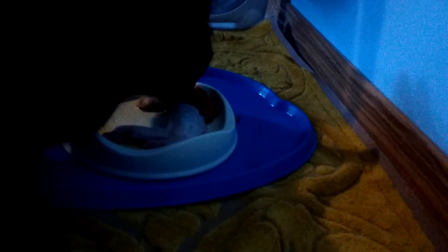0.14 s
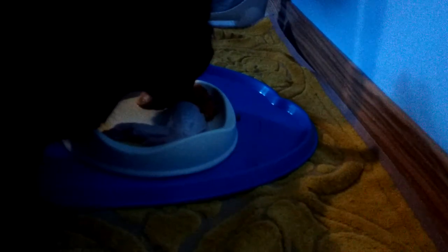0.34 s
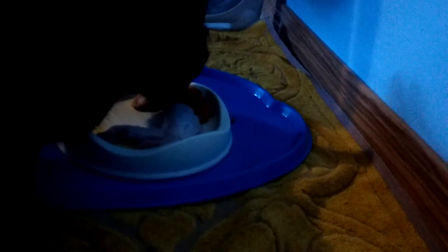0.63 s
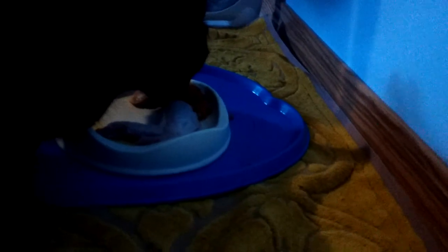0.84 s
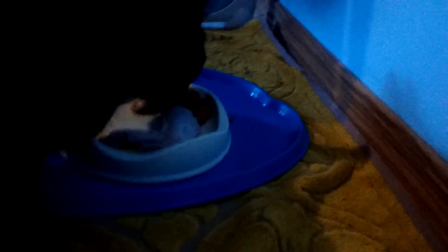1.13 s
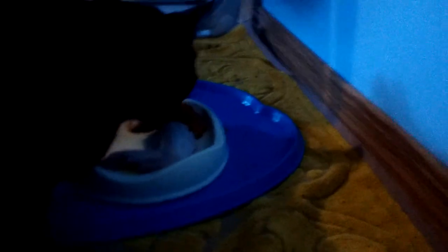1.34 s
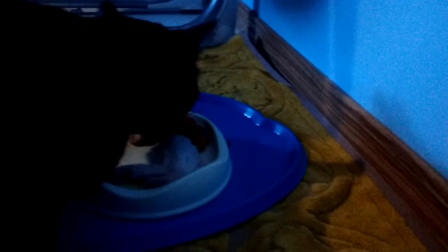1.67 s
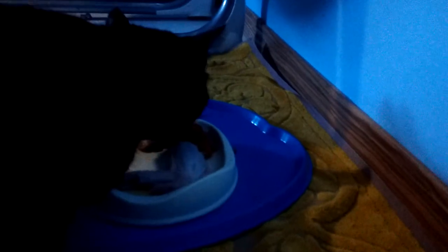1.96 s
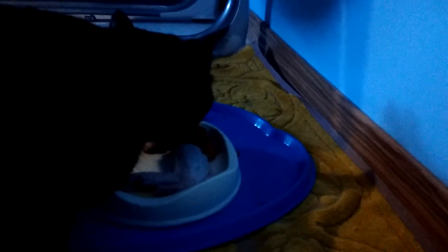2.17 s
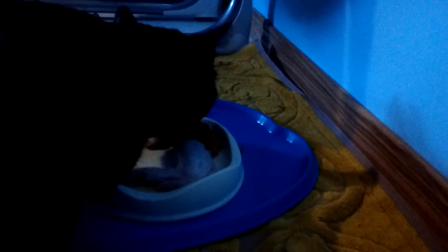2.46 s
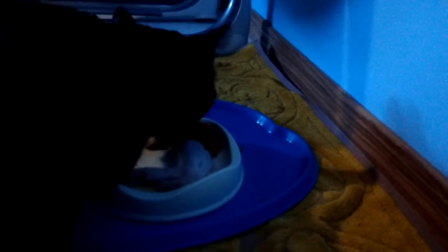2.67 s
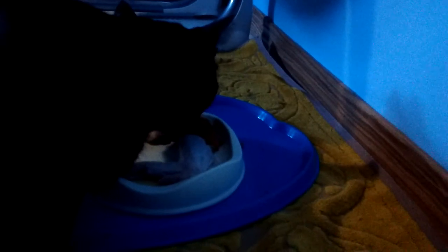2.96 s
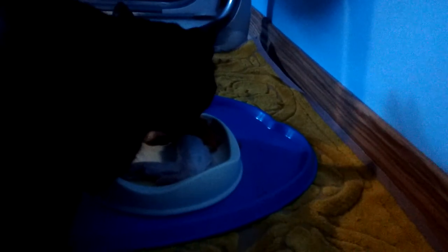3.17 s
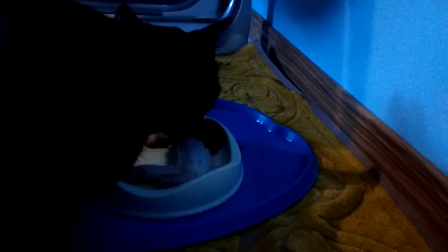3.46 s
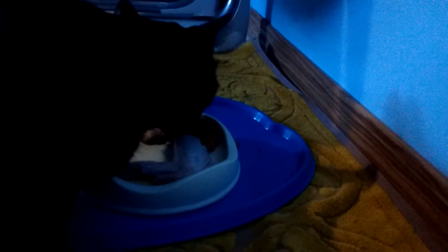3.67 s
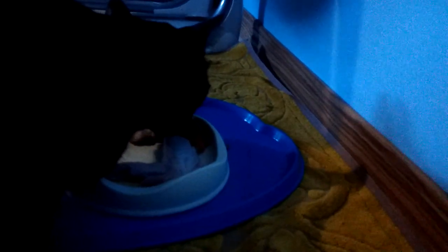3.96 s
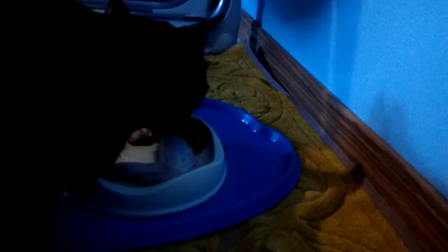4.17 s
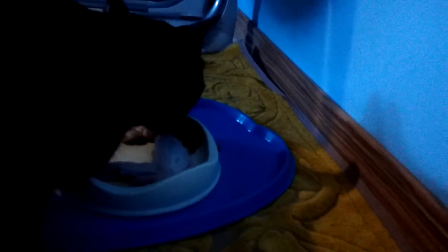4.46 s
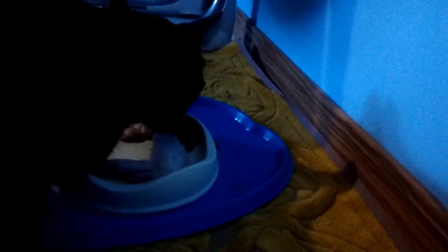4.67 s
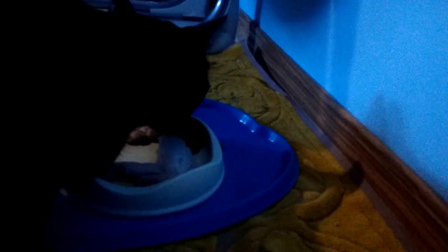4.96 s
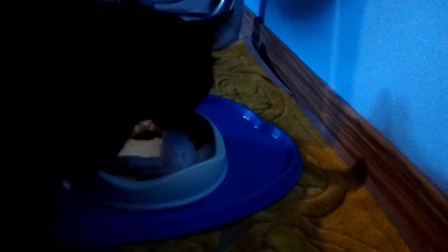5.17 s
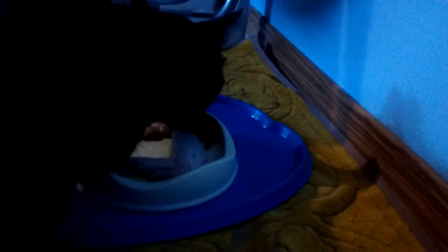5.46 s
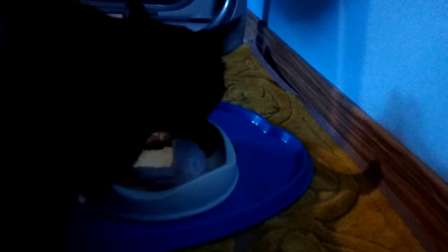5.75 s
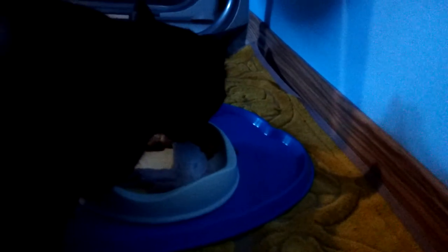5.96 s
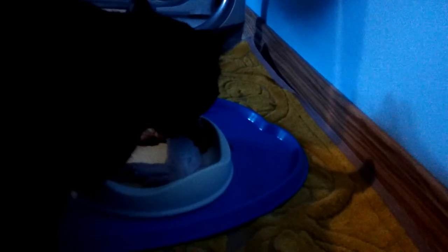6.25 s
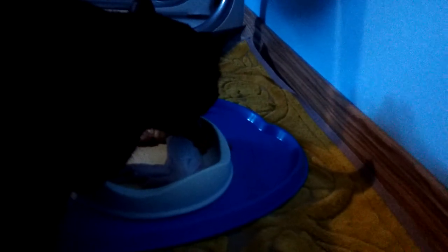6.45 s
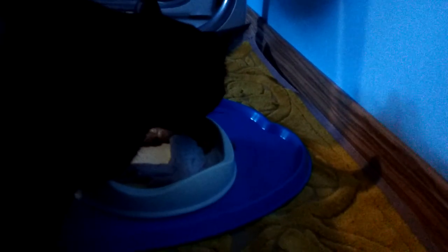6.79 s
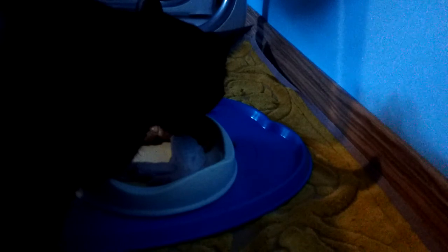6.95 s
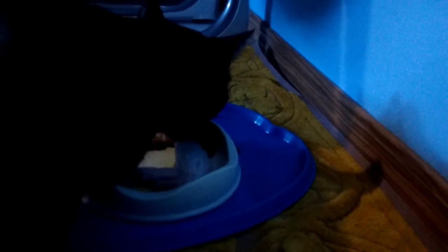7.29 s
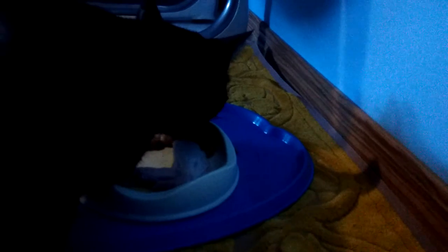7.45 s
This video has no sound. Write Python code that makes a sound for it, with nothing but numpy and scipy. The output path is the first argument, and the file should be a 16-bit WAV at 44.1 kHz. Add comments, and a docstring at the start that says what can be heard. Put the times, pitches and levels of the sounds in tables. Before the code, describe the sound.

Close, quiet wet chewing and licking by a cat, with small crackles, thin nasal breaths, an occasional bowl bump and clink over low room rumble.

```python
"""Cat eating wet food from a glazed bowl

Pops through mouth cavities make wet smacks, spit ticks and crackle; gliding tones and hissing breaths make the nose.
Metallic clinks, of teeth on the bowl and probably a collar tag, drive one set of ringing modes and a direct scrape.
The bowl bumps on its mat as decaying low sines. A quiet room adds an early copy, a short tail, rumble, hiss, hum
and whine. A pair of interleaved combs widens the stereo picture.
"""
import sys
import numpy as np
from scipy import signal
from scipy.fft import rfft, irfft, next_fast_len
from scipy.io import wavfile
from scipy.ndimage import map_coordinates

SR = 44100
rng = np.random.default_rng(int(sys.argv[2]) if len(sys.argv) > 2 else 0)


def unload_wav(signal):
    """Save mono or channel-first audio to the path in sys.argv[1] as 16-bit WAV at rate SR, clipped to [-1, 1]."""
    wavfile.write(
        sys.argv[1],
        SR,
        np.round(np.clip(np.atleast_2d(signal).T, -1, 1) * 32767).astype(np.int16),
    )


N = 336042


def amp(db):
    """Converts dB to amplitude."""
    return 10 ** (np.asarray(db) / 20)


def unit(x):
    """Scales each row to rms 1."""
    return x / np.sqrt(np.mean(x ** 2, axis=-1, keepdims=True) + 1e-20)


def along(points, hz):
    """Interpolates (Hz, value) points on a log frequency axis."""
    f, v = np.transpose(points)
    return np.interp(np.log(hz + 1), np.log(f + 1), v)


def wobble(knots_per_s):
    """Smooth random curve through normally distributed knots."""
    knots = rng.standard_normal(int(N * knots_per_s / SR) + 4)
    return map_coordinates(knots, [np.arange(N) * knots_per_s / SR])


def filtered(x, response):
    """Applies a complex frequency response to x."""
    m = next_fast_len(x.shape[-1] + SR // 2)
    return irfft(rfft(x, m) * response(np.fft.rfftfreq(m, 1 / SR)), m)[..., :x.shape[-1]]


def resonance(f, hz, width_hz):
    """Second-order bandpass response, gain 1 at its centre."""
    return 1j * f * width_hz / (hz * hz - f * f + 1j * f * width_hz)


def add(track, start_s, sound):
    """Mixes a sound into the track, cut at the track's end."""
    part = track[round(start_s * SR):][:len(sound)]
    part += sound[:len(part)]


def noise(response, correlation):
    """Shaped noise of rms 1 at two ports with the given correlation."""
    a, b = filtered(rng.standard_normal((2, N)), response)
    turn = np.arccos(np.clip(correlation, -1, 1)) / 2
    shared, opposed = np.cos(turn) * a, np.sin(turn) * b
    return unit(np.array([shared + opposed, shared - opposed]))


SNAP_SHARE = 0.13  # part of a pop that escapes its cavity, broad


def pops(start_s, level_db, hz, breadth, rustle_t60_s, rough):
    """Each pop is a snap with a dying rustle, coloured by one cavity resonance."""
    size = 4096
    t, f = np.arange(size) / SR, np.fft.rfftfreq(size, 1 / SR)
    push = rough * rng.standard_normal((len(start_s), size)) * amp(-60 * t / rustle_t60_s)
    push[:, 0] += rng.choice([-1, 1], len(start_s))  # the snap
    cavity = resonance(f, hz[:, None], 2.87 * (hz * breadth)[:, None]) ** 2
    escaped = SNAP_SHARE * resonance(f, hz[:, None], 2.1 * hz[:, None])
    sounds = irfft(rfft(push) * (cavity + escaped), size)[:, :size // 2]
    track = np.zeros(N)
    for start, level, sound in zip(start_s, level_db, sounds):
        add(track, start, amp(level) * sound / np.abs(sound).max())
    return track


# Wet smacks of lips and tongue. Each row: start in seconds, peak in dB before the lip filter, mouth pitch in Hz.
SMACKS = [(0.1937, -33, 2260), (.2504, -34.5, 2790), (0.537, -32, 2190), (0.6069, -31, 1000),
          (.6984, -19.5, 1480), (0.7408, -36, 1200), (.8461, -34.5, 790), (1.0086, -33, 1100),
          (1.1, -35, 2340), (1.217, -34.5, 2370), (1.3424, -39, 1200), (1.4163, -36, 2230),
          (1.632, -34, 1200), (1.706, -28, 2290), (2.0564, -34, 1160), (2.198, -38, 1000),
          (2.29, -34, 3000), (2.4786, -25.5, 1140), (2.917, -33, 2930), (3.056, -35, 2500),
          (3.15, -30.5, 875), (3.194, -31.5, 2720), (3.3438, -37, 2620), (3.4518, -43, 2500),
          (3.6459, -39, 990), (3.7368, -23, 1380), (3.755, -38, 1600), (3.768, -34, 1600),
          (3.7782, -35, 1500), (3.979, -19, 1350), (4.009, -39, 1500), (4.017, -30, 1640),
          (4.024, -39, 1600), (4.0482, -25, 3070), (4.052, -32, 1300), (4.06, -33, 2650),
          (4.2454, -32.5, 1300), (4.283, -26.5, 2550), (4.2867, -33, 2510), (4.29, -33, 2030),
          (4.6866, -37, 1130), (4.794, -35, 2610), (5.0378, -25.5, 2500), (5.2335, -27, 1040),
          (5.24, -32, 990), (5.3034, -36, 2300), (5.483, -17, 1480), (5.504, -38, 1000), (5.7806, -31, 830),
          (6.0706, -33, 1210), (6.3719, -32, 1510), (6.467, -35.5, 2400), (6.5815, -33.5, 2000),
          (6.797, -36, 940), (6.8175, -39, 1780), (6.9838, -38, 2290), (7.241, -34.5, 1090),
          (7.354, -32.5, 1110), (7.4348, -33, 2760), (7.4769, -37, 2260)]
SMACK_T60_S, SMACK_ROUGH = 0.017, 0.1
SMACK_BREADTH_AT_1KHZ, NARROWING = 0.74, 1.2  # a smaller mouth rings higher and narrower


def smacks():
    """Broad mouth pops echo off the bowl floor and its held air; soft lips dull them."""
    start_s, peak_db, hz = np.transpose(SMACKS)
    breadth = SMACK_BREADTH_AT_1KHZ * (hz / 1000) ** -NARROWING
    dry_smacks = pops(start_s, peak_db, hz, breadth, SMACK_T60_S, SMACK_ROUGH)

    def lips_and_bowl(f):
        held_air = 1 + 0.45 * resonance(f, 700, 380)
        floor_echo = 1 + 0.42 * np.exp(-2j * np.pi * f * 0.003287)
        return held_air * floor_echo / (1 + 1j * f / 4300) ** 3

    return filtered(dry_smacks, lips_and_bowl)


# Bursting spit films. Each row: start in seconds, peak in dB, pitch in Hz.
TICKS = [(.1926, -42, 7000), (0.2503, -37.5, 3780), (.506, -38, 6600), (.537, -34.5, 4320),
         (0.6028, -30, 4730), (0.607, -33, 4320), (0.607, -35, 7700), (.715, -35, 5000),
         (0.804, -31.5, 4500), (.831, -39, 4800), (.846, -39, 4800), (1.042, -45, 7300), (1.105, -41, 4200),
         (1.1271, -36, 7160), (1.138, -43, 7500), (1.1554, -42, 7400), (1.2163, -34, 10200),
         (1.342, -39, 4830), (1.397, -39, 4300), (1.4136, -37, 6200), (1.67, -42, 7900), (1.69, -43, 6800),
         (1.707, -33, 3800), (1.7323, -40, 8050), (2.056, -28, 5600), (2.23, -45, 7000),
         (2.2918, -40, 5100), (2.309, -41, 4000), (2.479, -46, 3900), (2.532, -40, 3900),
         (2.5922, -42, 8600), (2.603, -42, 10930), (2.917, -38.5, 8600), (2.9571, -41.5, 4670),
         (2.977, -42, 8200), (3.1959, -39, 9400), (3.4515, -36, 4750), (3.452, -30.5, 10100),
         (3.5456, -44, 7500), (3.6454, -41, 6400), (3.737, -49, 4640), (3.8112, -37, 11300),
         (3.866, -39, 10300), (3.9585, -45, 11700), (4.048, -37, 4000), (4.051, -32.5, 7840),
         (4.0605, -38, 7300), (4.1815, -41.5, 5000), (4.2451, -42, 4340), (4.2873, -37, 5460),
         (4.555, -44, 10060), (5.036, -40.5, 4100), (5.102, -42, 8650), (5.2167, -37.5, 5170),
         (5.3044, -35, 3800), (5.593, -44, 9900), (5.594, -45, 5000), (5.783, -36, 7500),
         (6.0704, -42, 5170), (6.37, -40, 3600), (6.5968, -42, 4040), (6.5762, -40, 10100),
         (6.6872, -43, 6600), (6.878, -37, 9100), (6.9804, -48, 8600), (7.0293, -48, 10400),
         (7.162, -33, 3380), (7.1716, -41, 5950), (7.2408, -33, 4500), (7.242, -40, 6900),
         (7.3395, -40.5, 6230), (7.4219, -39, 9100), (7.587, -38, 9200)]
TICK_T60_S, TICK_BREADTH = 0.0064, 0.18
CRACKLE_FLOOR_DB, CRACKLE_SPREAD_DB = -50, 1.5  # spread: mean rise above the floor


def spit():
    """Bursting films pop in narrow resonances, over a faint random crackle from 1.5 to 12 kHz."""
    start_s, peak_db, hz = np.transpose(TICKS)
    ticks = pops(start_s, peak_db, hz, TICK_BREADTH, TICK_T60_S, rough=0.58)
    when, size, pitch = rng.random(size=(350, 3)).T
    crackle_db = CRACKLE_FLOOR_DB - CRACKLE_SPREAD_DB * np.log(size)
    crackle = pops(when * N / SR, crackle_db, 1500 * 8 ** pitch, 0.28, TICK_T60_S, rough=0.88)
    return ticks + crackle


# Nose whistles, one list per curve. Each row: time in seconds, pitch in Hz, level in dB; pitch and level waver around it.
WHISTLES = [
    [(1.96, 5290, -60), (2.04, 5320, -53), (2.11, 5400, -51.5), (2.17, 5400, -60), (2.195, 5600, -55),
     (2.21, 5400, -57), (2.23, 6120, -50), (2.26, 5600, -61), (2.29, 5450, -55), (2.33, 5550, -56),
     (2.345, 5900, -61), (2.365, 5620, -64), (2.395, 5680, -60), (2.41, 5300, -64), (2.45, 5350, -68),
     (2.49, 5760, -64), (2.51, 5500, -70)],
    [(2.435, 7000, -62), (2.455, 7450, -61), (2.465, 7400, -64)],
    [(2.462, 8200, -60), (2.478, 8300, -60)],
    [(2.522, 7250, -64), (2.54, 7050, -64)],
    [(2.49, 8100, -55), (2.505, 7700, -56), (2.525, 8250, -60), (2.55, 7800, -64)],
    [(2.545, 5520, -61), (2.6, 5260, -58), (2.645, 5100, -61)],
    [(3.59, 6500, -54), (3.61, 6400, -50)],
    [(3.61, 5500, -62), (3.64, 5930, -61), (3.68, 5550, -66), (3.715, 5300, -64)],
    [(3.635, 8030, -54), (3.66, 7900, -55)],
    [(3.852, 6160, -55), (3.885, 6180, -49), (3.905, 6650, -47)],
    [(3.905, 7800, -55), (3.925, 7500, -59), (3.95, 7400, -62)],
    [(4.022, 5930, -54), (4.036, 5500, -60)],
    [(5.215, 5450, -62), (5.228, 5700, -56), (5.244, 5300, -64), (5.258, 4830, -61), (5.282, 4680, -69),
     (5.312, 4880, -62), (5.344, 5030, -64), (5.37, 5460, -58), (5.385, 5500, -61), (5.405, 5720, -55)],
    [(5.57, 6400, -52), (5.61, 6370, -49), (5.635, 6740, -49), (5.66, 7140, -52)],
    [(5.67, 7900, -57), (5.695, 7550, -60)],
    [(5.685, 5330, -57), (5.72, 5150, -64), (5.76, 5420, -65), (5.78, 5400, -66)],
    [(7.33, 5830, -50), (7.342, 6150, -52), (7.357, 6030, -58), (7.38, 6250, -67), (7.403, 5960, -59),
     (7.418, 6270, -48), (7.428, 5950, -51), (7.46, 6270, -48), (7.5, 6600, -47)],
    [(7.485, 7700, -59), (7.515, 8150, -50), (7.523, 8030, -47), (7.535, 8080, -44), (7.555, 7770, -49),
     (7.567, 8050, -55)],
    [(7.488, 5470, -56), (7.518, 5840, -50)],
    [(7.553, 5650, -50), (7.595, 5480, -55), (7.62, 5630, -49)],
]


def whistles():
    """Air whistles in a narrow nostril: a tone with a weak octave; the fainter, the less steady."""
    track, t = np.zeros(N), np.arange(N) / SR
    flutter, waver = wobble(110), wobble(300)
    for rows in WHISTLES:
        s, pitch_hz, level_db = np.transpose(rows)
        here = slice(round(s[0] * SR), round(s[-1] * SR))
        now = t[here]
        db = np.interp(now, s, level_db)
        unsteady = np.clip((-39 - db) / 12, 0.15, 1.5)
        hz = np.interp(now, s, pitch_hz) * (1 + 0.0045 * unsteady * waver[here])
        phase = 2 * np.pi * np.cumsum(hz) / SR
        edges = np.clip(np.minimum(now - s[0], s[-1] - now) / 0.0013, 0, 1)
        tone = np.sin(phase) + 0.069 * np.sin(2 * phase)
        add(track, s[0], amp(db + 1.6 * unsteady * flutter[here]) * edges * tone)
    return track


# Breaths. Each row: start in seconds, length in seconds, mid-breath level in dB before a slow random waver.
BREATHS = [(1.876, 0.87, -60), (3.552, 0.28, -61.5), (3.817, 0.29, -63.5), (5.182, 0.67, -58),
           (7.3, 0.36, -62)]


def breaths():
    """Breath hisses in the nose: resonant noise swelling and fading as half a sine."""
    t = np.arange(N) / SR
    flow = sum(amp(db) * np.sin(np.pi * np.clip((t - s) / length, 0, 1)) for s, length, db in BREATHS)
    nose_response = lambda f: resonance(f, 5800, 1400) + 0.48 * resonance(f, 6400, 2500)
    hiss = filtered(rng.standard_normal(N), nose_response)
    return flow * amp(1.1 * wobble(30)) * unit(hiss)


# Metallic clinks: teeth on the bowl, and at 1.8947 and 2.098 s probably a collar tag.
# Each row: start in seconds, blow in dB, rattle in dB, rattle rise in seconds, rattle t60 in seconds,
# damping by the touch 0-1, brightness in dB per octave, direct scrape in dB, then in dB how strongly the clink
# stirs the modes near 2.2 kHz, near 3.5 kHz, near 5.3 kHz and near 8.5 kHz.
CLINKS = [(0.726, -57, -62, 0.033, 0.26, 0.88, -0.5, 29.5, 6.5, -9.5, -11.5, -4),
          (1.8947, -45, -75, 0.0017, 0.31, 0.93, 9, 33, -2, -12, -2.5, 7),
          (2.098, -58, -84, .01, 0.25, .7, 5, 27, -2, -11, 2, 6),
          (5.404, -42, -49, 0.00096, 0.031, 0.14, -2.5, 17, 1, -7, -5, -1),
          (5.4104, -25.5, -57.5, 0.0029, 0.23, 0.62, 0, 26.5, 0.4, -3, 1.5, 0.5),
          (5.4275, -32.5, -62.5, 0.0024, .12, 0.58, 0.3, 27, 1, -11, 0, 1)]
# Ringing modes, shared by all clinks. Each row: frequency in Hz, level in dB before the clink's colouring,
# undamped t60 in seconds.
CLINK_MODES = [(1023, -19, .16), (1825, -22, .3), (2030, -25, .25), (2154, -12, .3), (2212, -18, .3),
               (2304, -19, .2), (2800, -17, .08), (3513, -6, .2), (3574, 2, .22), (4200, -24, .15),
               (4520, -24, .15), (5021, -21, .25), (5292, -11, .2), (5336, 2, .23), (5399, -12, .2),
               (5663, -19, .18), (5900, -19, .1), (6858, -18, .13), (7095, -19, .2), (7400, -15, .22),
               (7569, -19, .2), (8030, -14, .25), (8930, -18, .15), (9740, -20, .15), (10750, -21, .12),
               (12500, -26, .1), (14000, -29, .08)]


def clinks():
    """A blow and a rattle of tiny slips feed the modes; the touch makes part of the ring broad and short."""
    track, t = np.zeros(N), np.arange(SR // 2) / SR
    hz, level_db, t60_s = np.transpose(CLINK_MODES)[:, :, None]
    width_hz = np.log(1000) / (np.pi * t60_s)
    deep, low = (hz > 2000) & (hz < 2400), (hz > 3300) & (hz < 3800)
    high, top = (hz > 5200) & (hz < 5500), (hz > 7900) & (hz < 9000)
    signs = (-1.) ** np.arange(len(CLINK_MODES))[:, None]

    def scrape(f):
        upper = 0.53 * resonance(f, 7300, 4600) ** 2 + 0.13 * resonance(f, 13000, 5000) ** 2
        return resonance(f, 2220, 1800) + upper

    for (start_s, blow_db, rattle_db, rise_s, rattle_t60_s, damped, tilt_db, scrape_db,
         deep_db, low_db, high_db, top_db) in CLINKS:
        slips = unit(rng.standard_normal(len(t)) ** 3)
        decay_db = -60 * np.maximum(t - rise_s, 0) / rattle_t60_s
        push = amp(rattle_db + decay_db) * np.minimum(t / rise_s, 1) * slips
        push[:5] += amp(blow_db) * np.hanning(7)[1:-1] / 3
        stir_db = deep_db * deep + low_db * low + high_db * high + top_db * top
        size = signs * amp(level_db + tilt_db * np.log2(hz / 4000) + stir_db) * SR / np.pi

        def response(f):
            free = (1 - damped) * resonance(f, hz, width_hz) / width_hz
            held = damped * resonance(f, hz, 110) / np.sqrt(260 * width_hz)
            return np.sum(size * (free + held), axis=0) + amp(scrape_db) * scrape(f)

        add(track, start_s, filtered(push, response))
    return track


# Bowl bumping on its mat. Each row: start in seconds, level in dB before onset and decay, pitch in Hz.
BUMPS = [(0.702, -20, 152), (2.48, -22, 130), (3.736, -26, 252), (3.982, -39, 248), (5.485, -16.5, 120),
         (5.785, -18, 120)]
BUMP_CYCLES = 8.9  # until 60 dB down


def bumps_on_mat():
    """The bowl bumps on its mat: a low sine with a soft onset, dying faster at higher pitch."""
    track, t = np.zeros(N), np.arange(SR // 2) / SR
    for start_s, db, hz in BUMPS:
        decay = amp(db - 60 * t * hz / BUMP_CYCLES)
        onset = 1 - np.exp(-t / 0.00096)
        add(track, start_s, decay * onset * np.sin(2 * np.pi * hz * t))
    return track


# Room decay. Each row: frequency in Hz, t60 in seconds.
ROOM = [(300, 0.12), (2000, 0.28), (10000, 0.032)]


def room(x):
    """Each frequency of the room's answer dies at its own speed, differently at each port."""
    hz, t, z = signal.stft(rng.standard_normal((2, SR // 3)), SR, nperseg=256)
    dying = z * amp(-60 * t / along(ROOM, hz)[:, None])
    tail = signal.istft(dying, SR, nperseg=256)[1]
    delayed = np.pad(x, (100, 0))[None]
    return signal.fftconvolve(delayed, tail / np.linalg.norm(tail[0]), axes=1)[:, :N]


# Drift of the room's level. Each row: time in seconds, hiss in dB before a random waver.
AIR = [(0, -54.5), (.8, -53.5), (1.5, -54), (2.3, -53.5), (2.8, -55.5), (4.1, -54), (4.7, -55.5),
       (5.7, -54), (6.5, -54), (7.62, -54.5)]
# Noise spectra. Each row: frequency in Hz, relative density in dB per Hz.
RUMBLE = [(15, -16), (50, -7), (120, -4.5), (200, -12), (330, -15.5), (500, -28), (900, -28), (1500, -80)]
HISS = [(200, -8.5), (500, 0), (900, -2.5), (1500, -5.5), (2400, -8), (3300, -10.5), (4500, -15.5),
        (6400, -25), (9000, -54)]
HIGH_HISS = [(3000, -2.5), (6000, -4), (9000, 0), (11000, -2.5), (13000, -5.5), (16000, -5.5)]
# Room modes in the rumble. Each row: frequency in Hz, width in Hz, lift in dB.
ROOM_MODES = [(61, 7.8, 5), (89, 3.8, 7.5), (120, 6.6, 4), (154.5, 26, 5), (205, 18, 4.5), (261, 10.3, 5)]
RUMBLE_OVER_HISS_DB, HIGH_OVER_HISS_DB = 15, -6


def air():
    """Rumble gathered in the room's modes and two bands of hiss, drifting together and wavering apart."""
    hiss_db = np.interp(np.arange(N) / SR, *np.transpose(AIR))

    def boom(f):
        lift_db = sum(db * np.abs(resonance(f, hz, width_hz)) for hz, width_hz, db in ROOM_MODES)
        return amp(along(RUMBLE, f) + lift_db)

    rumble = amp(hiss_db + RUMBLE_OVER_HISS_DB + 1.36 * wobble(8.5)) * noise(boom, 0.016)
    hiss = amp(hiss_db + 1.05 * wobble(6.4)) * noise(lambda f: amp(along(HISS, f)), -0.09)
    high_db = hiss_db + HIGH_OVER_HISS_DB + 1.5 * wobble(9.7)
    high = amp(high_db) * noise(lambda f: amp(along(HIGH_HISS, f)), 0.083)
    return rumble + hiss + high


# Fuzzy lines of an appliance far off. Each row: frequency in Hz, resonator width in Hz (applied twice), level in dB.
HUM = [(525.3, 9.6, -65.5), (1014, 7.6, -69.5)]
WHINE_HZ, WHINE_MEAN_DB = 857, -58.5


def appliance():
    """A far appliance hums as narrow noise bands and whines as a sine of wavering level and phase."""
    hum = sum(amp(db) * noise(lambda f: resonance(f, hz, width_hz) ** 2, 0.37) for hz, width_hz, db in HUM)
    level = amp(WHINE_MEAN_DB + 1.56 * wobble(8.1))
    whine = level * np.sin(2 * np.pi * WHINE_HZ * np.arange(N) / SR + 0.29 * wobble(6.6))
    return hum + whine * [[1], [0.6]]


def scene():
    """Mixes cat, clinks, bumps, early copy, room tail and background at two ports."""
    wet = smacks() + spit()
    ringing = whistles() + breaths() + clinks() + bumps_on_mat()
    near = wet + ringing
    early = 0.5 * np.pad(near, (130, 0))[:N] * [[1], [-0.4]]  # off the bowl's rim and the wall
    tail = room(amp(-12) * wet + amp(-7) * ringing)  # the bowl shields the mouth from the room
    return near + early + tail + air() + appliance()


# Comb phase. Each row: frequency in Hz, phase in quarter turns (odd: all in the difference, even: all in the sum).
COMB = [(0, 0.969), (300, 1.0886), (500, 1.273), (770, 1.401), (1500, 2.07), (3200, 3.004), (4750, 4.13),
        (6400, 4.88), (8000, 6.22), (10200, 7.45), (12300, 7.59), (14000, 9.2), (15500, 9.6), (17000, 5.4)]
# Leak into the comb gaps. Each row: frequency in Hz, level in dB.
LEAK = [(100, -28), (1500, -12.5), (3200, -11), (4750, -10), (6400, -13.5), (9000, -5.5), (12000, -11),
        (15000, -4.5)]
# Stereo lean. Each row: frequency in Hz, left minus right in dB.
LEAN = [(100, 0.97), (3000, 0), (6500, 0.5), (8800, -4), (10500, 1.5), (14000, 1.5)]
TOP_HZ = 15800  # nothing passes above


def record(dry):
    """One port feeds the channels' sum, the other their difference, through combs that fill each other's gaps."""
    turn = lambda f: np.pi / 2 * np.interp(f, *np.transpose(COMB))
    gap = lambda f: amp(along(LEAK, f))
    mid = filtered(dry[0], lambda f: np.cos(turn(f)) + 1j * gap(f) * np.sin(turn(f)))
    side = filtered(dry[1], lambda f: -1j * np.sin(turn(f)) + gap(f) * np.cos(turn(f)))
    lean = lambda f: amp(along(LEAN, f) * np.array([[0.5], [-0.5]])) * (f < TOP_HZ)
    return filtered(np.array([mid + side, mid - side]), lean)


dry = scene()
out = record(dry)
unload_wav(out)
```